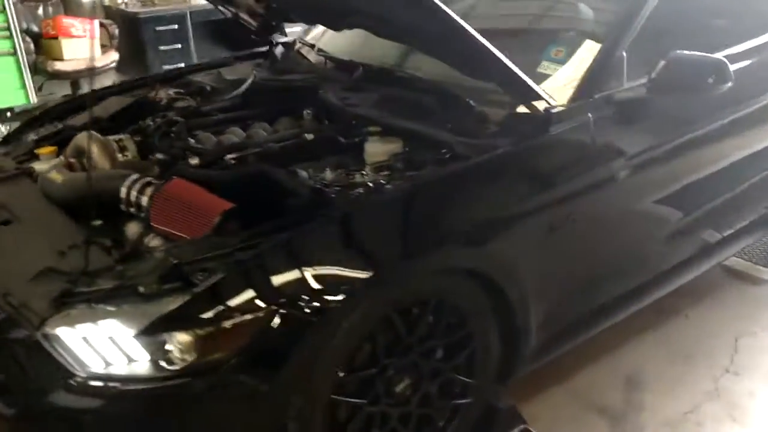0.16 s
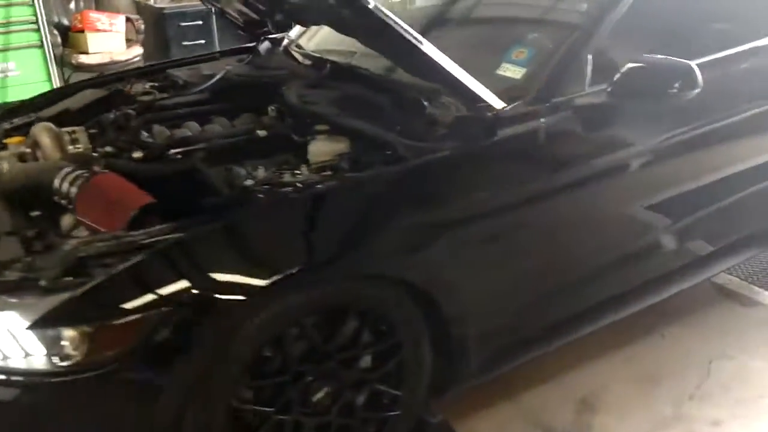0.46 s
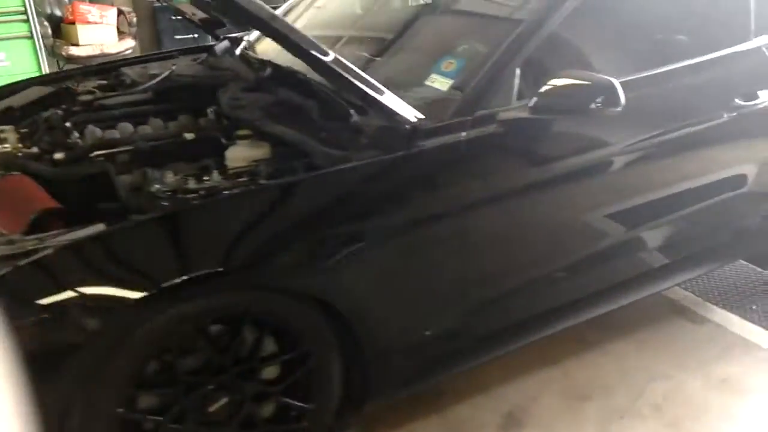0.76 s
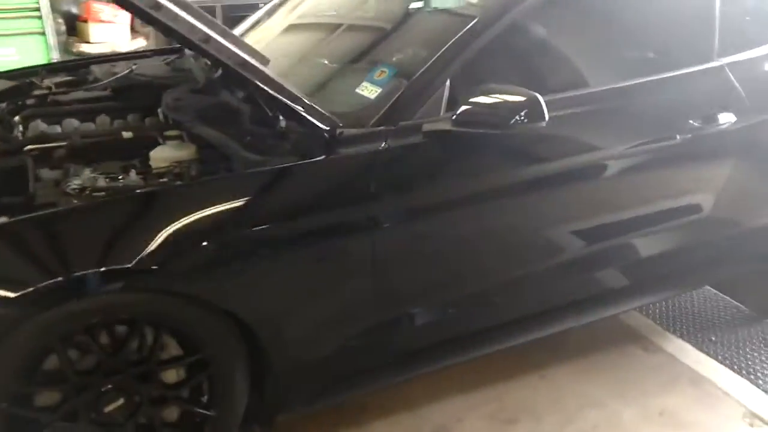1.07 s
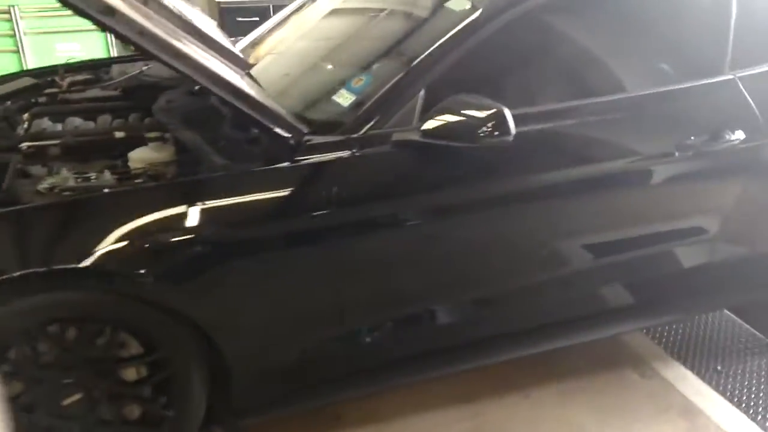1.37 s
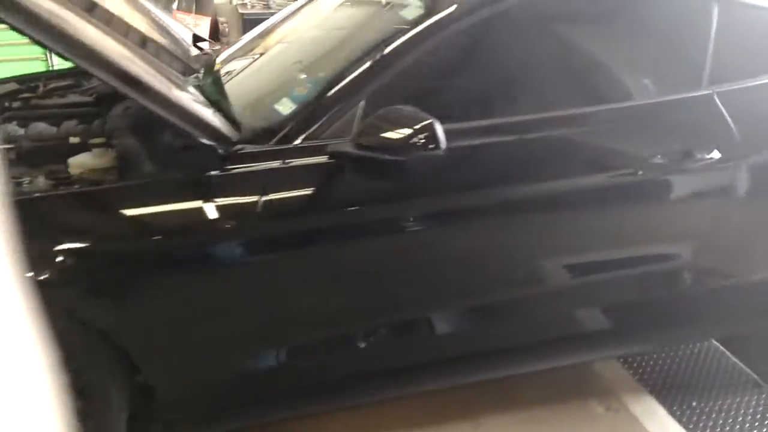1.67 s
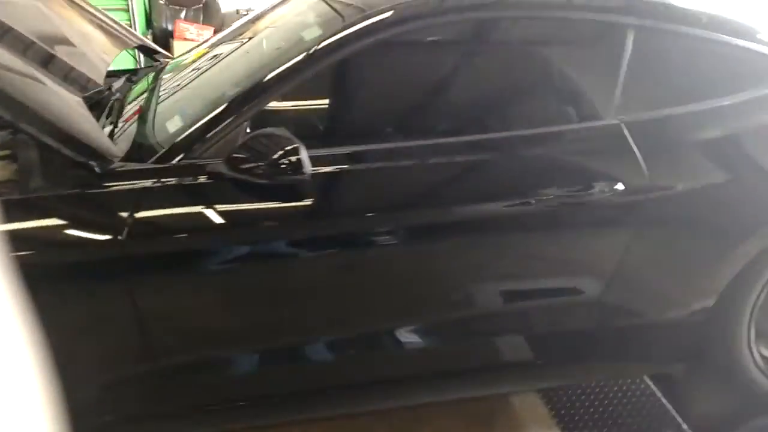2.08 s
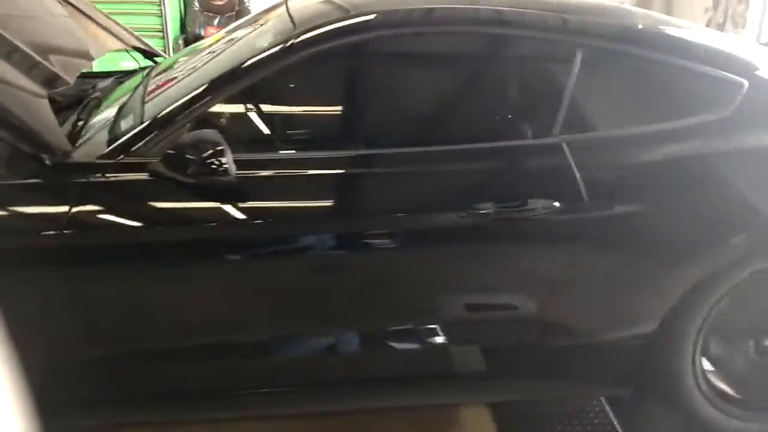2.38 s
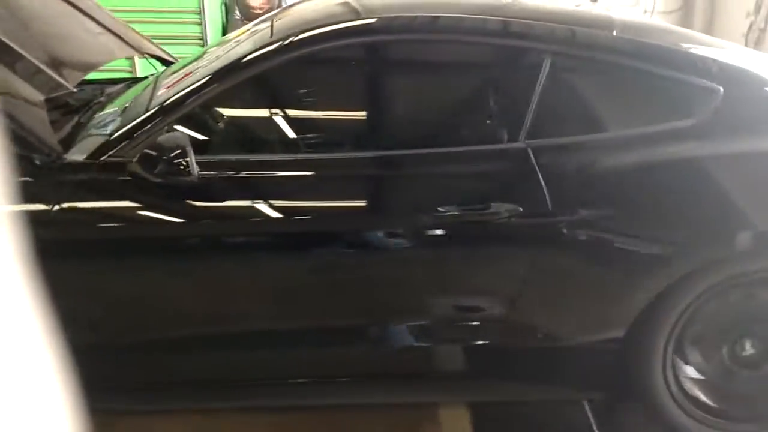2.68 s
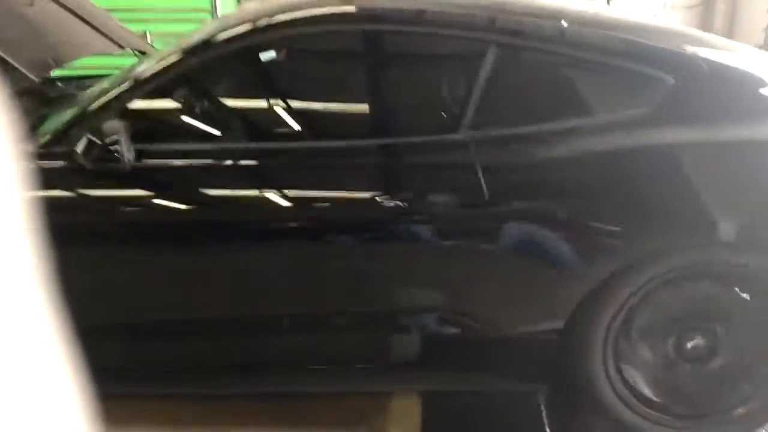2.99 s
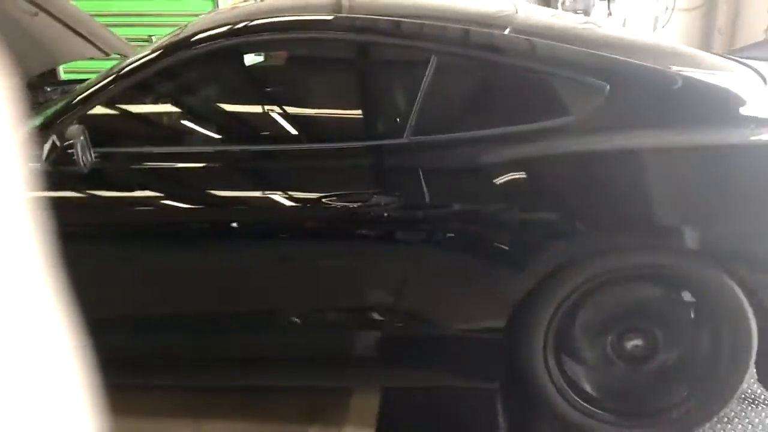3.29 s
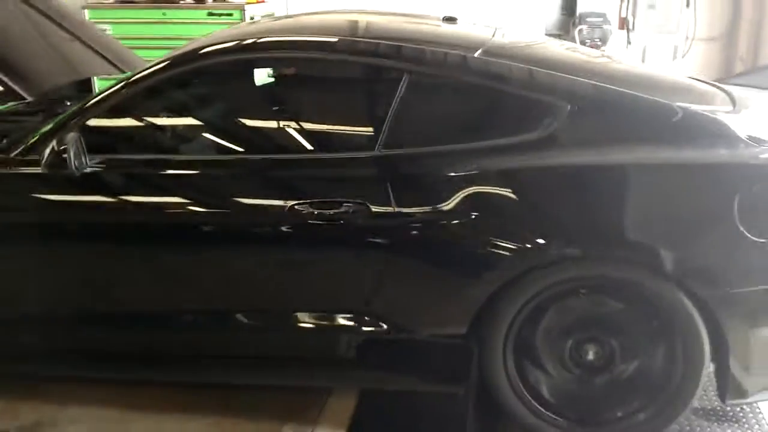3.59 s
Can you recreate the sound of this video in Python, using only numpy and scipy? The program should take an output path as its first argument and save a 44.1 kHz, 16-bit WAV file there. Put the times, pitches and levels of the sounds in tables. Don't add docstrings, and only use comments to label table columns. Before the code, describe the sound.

A car engine drones steadily on workshop rollers, then the throttle opens into a rough climbing roar.

```python
import sys
import numpy as np
from scipy import signal
from scipy.fft import rfft, irfft, next_fast_len
from scipy.io import wavfile
from scipy.ndimage import uniform_filter1d

SR = 44100
rng = np.random.default_rng(int(sys.argv[2]) if len(sys.argv) > 2 else 0)


def how_loud(loudness_db):
    steps = np.asarray(loudness_db, float) / 20
    return 10 ** steps


def int16_out(signal):
    q = np.round(np.clip(np.atleast_2d(signal).T, -1, 1) * 32767)
    wavfile.write(sys.argv[1], SR, q.astype(np.int16))


N = 164493
T = np.arange(N) / SR
SIZE = next_fast_len(N + 4096)
F = np.arange(SIZE // 2 + 1) * SR / SIZE + 1e-3

# f/Hz, density/dB per Hz
SHOP = [(50, -35), (130, -15), (330, -8), (480, -15.5), (820, -11), (1400, -16.5), (5500, -20),
        (15500, -38)]
# f/Hz, level/dB, peak t/s, length/s
PANEL_RINGS = [
    (851, -20.5, 2.74, 0.11),
    (656, -27.5, 2.56, 0.26),
    (938, -30, 2.52, 0.15),
    (1452, -21.5, 3.09, 0.12),
    (1447, -27, 2.9, 0.13),
    (1365, -28.5, 2.4, 0.088),
    (2530, -26, 2.4, .08),
    (2685, -26.5, 3.27, .08),
]
# t/s, f/Hz
SPEED = [
    (0, 19.96),
    (2.24, 20.42),
    (2.36, 20.85),
    (2.56, 21.7),
    (2.76, 22.0),
    (3.22, 23.5),
    (3.73, 25.3),
]
# t/s, drone level/dB, bark level/dB, rush level/dB, bass gain/dB
ENGINE = [(0.0, -14.5, -25, -30, -5), (0.04, -20.5, -25, -32, -10.5), (0.44, -20, -24, -29, -6),
          (0.51, -17, -25, -25, -10.5), (0.88, -18.5, -24, -30, -4.5), (1.04, -22, -24, -41, -0.5),
          (2.18, -21, -27, -41, -2.5), (2.31, -15.5, -13, -38, -4.5), (2.39, -17.5, -15, -36, -3),
          (2.43, -23.5, -17.5, -37, -2), (2.72, -31, -16.5, -21.5, -9), (3.1, -49, -19, -19, -5),
          (3.22, -29, -17.5, -18, -5.5), (3.39, -30, -18.5, -18.5, -1), (3.47, -21, -19, -17.5, -8),
          (3.53, -36, -17.5, -17, -38), (3.71, -31, -17.5, -19, -38), (3.73, -27, -16, -17.5, -23)]
# order/engine cycles, level/dB
WHINE = [(283.4, -39), (295.8, -48)]
# peak t/s, length/s, rise/dB
WHINE_SWELLS = [
    (0, .06, 4),
    (.45, .14, 9),
    (.75, .09, 6),
    (.98, .1, 4),
    (1.4, .07, 3),
    (1.83, .14, 5),
]
# order/engine cycles, level/dB
UPPER_ORDERS = [(32, -42.5), (34, -44.5), (37, -40), (39, -44.5), (40, -43), (42, -41), (45, -42),
                (48, -50)]
# order/engine cycles, level/dB
CRUISE_ORDERS = [(1, -63), (2, -51), (3, -26), (4, -27), (5, -24), (6, -14), (7, -13), (8, -16), (9, -10),
                 (10, -14), (11, -11.5), (12, -43), (13, -26.5), (14, -8.5), (15, -7.5), (16, 2.5),
                 (17, -46), (18, -12.5), (19, -28.5), (20, -44), (21, -19), (22, -24), (23, -21.5),
                 (24, -20), (25, -23.5), (26, -17.5), (27, -52), (28, -47)]
# order/engine cycles, level/dB, peak t/s, length/s
FLARES = [(25.97, -29, .2, 0.095), (40, -33, .3, 0.13), (41.7, -30.5, 0.56, 0.087), (32.2, -32, 0.72, 0.13),
          (41.7, -32, 0.9, 0.21), (37, -31, 1.04, 0.29), (47.7, -34, 0.9, .08), (41.7, -40, 1.45, 0.24),
          (37, -29, 1.72, 0.093), (20.87, -33, 2.14, 0.18), (18.04, -21.5, 2.365, 0.066),
          (30.96, -23, 2.37, 0.11), (27.95, -23, 2.37, .07), (37.8, -26, 2.38, 0.062),
          (41.9, -25.5, 2.38, 0.12), (45.2, -27.5, 2.42, .06), (31, -27, 2.65, 0.1), (16, -23, 2.74, 0.21),
          (19, -28.5, 2.65, 0.14), (40, -25, 3.04, 0.15), (24.4, -27, 3.1, 0.062), (32, -27, 3.1, 0.086),
          (71.6, -21.5, 3.275, 0.24), (16.12, -25.5, 3.365, 0.14), (24.2, -25.5, 3.405, 0.17),
          (31.75, -26, 3.5, 0.18), (39.97, -28.5, 3.6, 0.16), (56, -30.5, 3.6, .15),
          (16.2, -24.5, 3.66, 0.084)]
# f/Hz, density/dB per Hz
RUSH = [(590, -23), (1000, -9.5), (1680, -1), (2180, -5.5), (2770, -8), (4190, -8.5), (7610, -14),
        (15500, -27.5)]
# t/s, jump/dB, fade/s
SURGES = [
    (2.362, 8.5, 0.033),
    (2.51, 5, 0.12),
]
# f/Hz, density/dB per Hz
BARK = [(88, -43), (150, -2.5), (384, -2), (451, -5.5), (651, -5.5), (967, -1.5), (1100, -13.5),
        (1370, -5.5), (5000, -25.5), (6500, -70), (11000, -120)]
# f/Hz, width/Hz, level/dB
PIPE = [(610, 58, 4), (835, 60, 2.5), (1530, 250, -3), (2598, 170, 8.5), (3150, 730, -0.5),
        (4970, 770, 8.5)]
# order/firing rate, level/dB
LOAD_ORDERS = [(1, -11), (2, -12), (3, -9.5), (4, -7), (5, -12), (6, -11), (7, 2.5), (8, 4), (9, -3),
               (10, 4), (11, -6), (12, -4)]
CYLINDERS_DB = [8.5, -28, 1.5, -3, -9, 0, -5.5, -4]
# f/Hz, width/Hz, cruise depth/0-1, load depth/0-1
PORT_NOTCHES = [(2087, 350, 0.92, 0.29), (2206, 220, 0.09, 0.53), (4350, 670, 0.74, 0.54),
                (6380, 530, 0, 0.83), (8360, 210, 0.4, 0.4), (10550, 350, 0.77, 0.26),
                (12500, 400, .75, 0.2)]
# f/Hz, cruise level/dB, load level/dB
WIDTH = [(196, -3.5, 7.5), (970, -14.5, -9.5), (1397, -4, -0.5), (2200, 13.5, 4.5), (2400, -11, -0.5),
         (2820, -7, -6.5), (3170, -7.5, -10), (3470, -2, -7.5), (9200, -2, 0.5)]
LINKS = [(3, .43, .65), (4, .75, .56), (5, .347, .49)]
# f/Hz, width/Hz, start t/s, end t/s
DROPOUTS = [(2060, 260, .02, 1.13), (2060, 300, 1.19, 2.32), (2150, 330, .6, 1.0), (2060, 260, 2.55, 2.67),
            (2200, 90, 2.76, 2.89), (2130, 130, 3.02, 3.15), (2190, 100, 3.22, 3.3), (2210, 90, 3.41, 3.52),
            (2150, 200, 3.55, 3.7), (4380, 260, .01, .08), (4400, 200, .16, .22), (4370, 330, .28, .62),
            (4400, 330, .67, .74), (4320, 140, 1.0, 1.2), (4350, 350, 1.28, 1.34), (4350, 140, 1.36, 1.74),
            (4330, 200, 1.79, 1.92), (4420, 300, 2.13, 2.27), (6370, 220, 2.68, 2.86),
            (6450, 250, 3.65, 3.69), (12620, 350, .28, .74), (12620, 350, 1.27, 1.36),
            (12600, 200, 1.8, 2.05), (12620, 330, 2.13, 2.36), (10400, 220, .65, .78),
            (13750, 330, 2.43, 3.2)]

THROTTLE_S, OPENING_S = 2.275, 0.12
BASS_EDGE_HZ, SHARED_CUT_DB = 268, -3


def level(x, db):
    return x * how_loud(db) / np.sqrt(np.mean(x ** 2))


def shape(x, gain):
    return irfft(rfft(x, SIZE) * gain, SIZE)[..., :N]


def lowpass(cut_hz, power):
    return 1 / (1 + (F / cut_hz) ** power)


def curve(table, col=1):
    table = np.array(table)
    return np.interp(np.log(F), np.log(table[:, 0]), table[:, col])


def walk(rate_hz):
    grid_hz = 500
    k, steps = int(grid_hz / rate_hz), N * grid_hz // SR + 2
    held = np.repeat(rng.standard_normal(steps // k + 1), k)
    slow = uniform_filter1d(uniform_filter1d(held, k), k)[:steps]
    return 1.3 * np.interp(T * grid_hz, np.arange(steps), slow)


def gate(start_s, end_s, edge_s):
    return np.clip(np.minimum(T - start_s, end_s - T) / edge_s + .5, 0, 1)


def bump(peak_s, length_s):
    return np.exp(-((T - peak_s) / length_s) ** 2)


def control(col):
    table = np.array(ENGINE)
    return np.interp(T, table[:, 0], table[:, col])


def load():
    return np.clip((T - THROTTLE_S) / OPENING_S, 0, 1)


def lines(cycles, orders, wobble_db, drift, rate_hz):
    out = 0
    for k, db in orders:
        gain = how_loud(db + wobble_db * walk(rate_hz)) * np.sqrt(2)
        turns = k * cycles + rng.random() + drift * walk(rate_hz)
        out = out + gain * np.sin(2 * np.pi * turns)
    return out


def air(table, flicker_db, rate_hz):
    out, octave = 0, np.log2(F)
    white = rfft(rng.standard_normal(SIZE)) * how_loud(curve(table))
    for centre in np.arange(5.5, 14.2, .5):
        band = np.cos(np.pi * np.clip(octave - centre, -.5, .5)) ** 2
        out = out + how_loud(flicker_db * walk(rate_hz)) * irfft(white * band, SIZE)[:N]
    return out


def room(x):
    t60_s, tail_db = .35, 9
    tail = rng.standard_normal(SR // 2) * np.exp(-np.log(1000) * T[:SR // 2] / t60_s)
    return shape(x, 1 + rfft(tail * how_loud(tail_db) / np.sqrt(np.sum(tail ** 2)), SIZE))


def flares(cycles, table):
    wobble_db, drift = 1.5 + .5 * load(), .07 + .05 * load()
    return sum(lines(cycles, [(k, db)], wobble_db, drift, rate_hz=16) * bump(peak_s, length_s)
               for k, db, peak_s, length_s in table)


def floor_rumble():
    noise = shape(rng.standard_normal(N), 1 / (1 + ((F - 70) / 30) ** 2))
    return level(noise, -57) * how_loud(-2.0 + 2.8 * walk(8.9) + 3 * load())


def shop_noise():
    duck_db = -6 * np.clip((T - THROTTLE_S + 0.087) / 0.13, 0, 1)
    sway_db = 0.19 * walk(3.53) + 0.4 * walk(9.12)
    opening_db = 1.17 * np.exp(-(T / 0.68) ** 4)
    return level(air(SHOP, flicker_db=1.27, rate_hz=8.58), -21.5) * how_loud(duck_db + sway_db + opening_db)


def thump():
    return level(shape(rng.standard_normal(N), lowpass(150, 4)), -30) * bump(3.465, .025)


def panel_rings():
    return flares(T, PANEL_RINGS)


def blower_whine(cycles):
    whine = lines(cycles, WHINE, wobble_db=1.5, drift=0.08, rate_hz=12) * (1 - load())
    return whine * how_loud(sum(db * bump(peak_s, length_s) for peak_s, length_s, db in WHINE_SWELLS))


def valve_train(cycles):
    return lines(cycles, UPPER_ORDERS, wobble_db=4.0, drift=0.21, rate_hz=8.04) * (1 - load())


def exhaust_drone(cycles):
    drone = level(lines(cycles, CRUISE_ORDERS, wobble_db=0.4, drift=0.055, rate_hz=2.45), 0)
    break_db = -6 * gate(2.355, 2.4, 0.018)
    return drone * how_loud(control(1) + 1.0 + break_db)


def intake_rush():
    surge_db = sum(db * (T > at) * np.exp(-np.abs(T - at) / fade) for at, db, fade in SURGES)
    rush = level(air(RUSH, flicker_db=0.44, rate_hz=8), 5)
    return rush * how_loud(control(3) + 0.5 * walk(8.4) + surge_db) * gate(SURGES[0][0], 9, .01)


def exhaust_bark(cycles):
    fired = np.floor(8 * cycles).astype(int)
    starts = np.flatnonzero(np.diff(fired)) + 1
    chance = rng.standard_normal((len(starts), 2))
    jitter = np.round(3.0 * chance[:, 0]).astype(int)
    at = np.clip(starts + jitter, 0, N - 1)
    pulses = np.zeros(N)
    pulses[at] = how_loud(np.array(CYLINDERS_DB)[fired[starts] % 8] + 1.7 * chance[:, 1])
    puff = .5 + np.exp(-(8 * cycles % 1) / 0.85)
    gas = puff * air(BARK, flicker_db=0.5, rate_hz=14)
    pipe = how_loud(sum(db / (1 + (2 * (F - hz) / w) ** 2) for hz, w, db in PIPE))
    firing = [(8 * k, db) for k, db in LOAD_ORDERS]
    tones = lines(cycles, firing, wobble_db=-0.5, drift=0.32, rate_hz=14)
    roar = level(room(shape(pulses, pipe * how_loud(curve(BARK)))), -4)
    roar = roar + level(shape(gas, pipe), -2.5) + level(room(shape(tones, pipe)), -13)
    return roar * how_loud(control(2)) * load()


def scene():
    cycles = np.cumsum(np.interp(T, *np.array(SPEED).T)) / SR
    engine = shop_noise() + panel_rings() + blower_whine(cycles) + valve_train(cycles)
    engine = engine + exhaust_drone(cycles) + flares(cycles, FLARES) + intake_rush() + exhaust_bark(cycles)
    engine = shape(engine, 1 / np.sqrt(1 + (122 / F) ** 4))
    bass = shape(engine, lowpass(BASS_EDGE_HZ, 24))
    bass_gain = how_loud(np.maximum(control(4) + 6.1, SHARED_CUT_DB))
    mono = engine + bass * (bass_gain - 1) + thump() + floor_rumble()
    return np.array([mono, mono])


def dropouts(mid):
    spectrum = rfft(mid, SIZE)
    lost = 0
    for hz, w, start_s, end_s in DROPOUTS:
        band = irfft(spectrum / (1 + (2 * (F - hz) / w) ** 6), SIZE)[..., :N]
        lost = lost + band * gate(start_s, end_s, .012)
    return .97 * lost


def centre_bass_loss(mid):
    kept = how_loud(np.minimum(control(4) + 6.5 - SHARED_CUT_DB, 0))
    lost = (1 - kept) * shape(mid, lowpass(BASS_EDGE_HZ, 24))
    deep = shape(mid - lost, lowpass(177, 12))
    return lost + 0.82 * gate(2.54, 3.06, 0.055) * deep


def spread():
    band_hz, allpass_top, long_top = 375., 23, 35
    band = np.floor(F / band_hz)
    mid = band + .5

    def late(slots, turn=0):
        return np.exp(-1j * np.pi * (slots * F / band_hz + turn * mid))

    chain, fade = late(2, .39), np.clip(1 - .05 * (band - 3), 0, 1)
    for slots, turn, g in LINKS:
        chain = chain * (late(slots, turn) - g * fade) / (1 - g * fade * late(slots, turn))
    delays = np.where(band < long_top, late(14), late(1))
    return np.where(band < allpass_top, chain, delays)


def ports_and_width(mono):
    out, wide = 0, spread()
    late_load = np.roll(load(), 1500) * (T > 1)
    throttle = np.clip(late_load + 0.23 * walk(4.03) - .14, 0, 1)
    for col, share in ((0, 1 - throttle), (1, throttle)):
        ports = F < 15750
        for row in PORT_NOTCHES:
            ports = ports * (1 - np.clip(row[2 + col], 0, 1) / (1 + (2 * (F - row[0]) / row[1]) ** 2))
        angle = np.arctan(how_loud(curve(WIDTH, col + 1)))
        mid = shape(mono, ports * np.cos(angle))
        side = shape(mono, ports * np.sin(angle) * wide)
        out = out + 1.07 * share * np.array([mid + side, mid - side])
    return out


def roll_off(x):
    return signal.sosfilt(signal.butter(12, 15720, fs=SR, output="sos"), x)


def record(dry):
    mono = dry[0] + how_loud(-54) * np.sin(2 * np.pi * 14063 * T)
    out = ports_and_width(mono)
    pan_db = np.interp(T, (0.19, THROTTLE_S), (2.5, -6)) * (1 - load())
    out = out + shape(out, lowpass(450, 4)) * (how_loud(np.array([pan_db, -pan_db]) / 2) - 1)
    out = out - dropouts(out)
    out = out - dropouts(out.mean(axis=0))
    out = out - centre_bass_loss(out.mean(axis=0))
    mix = np.clip(out, -1, 1)
    return roll_off(mix)


dry = scene()
out = record(dry)
int16_out(out)
```